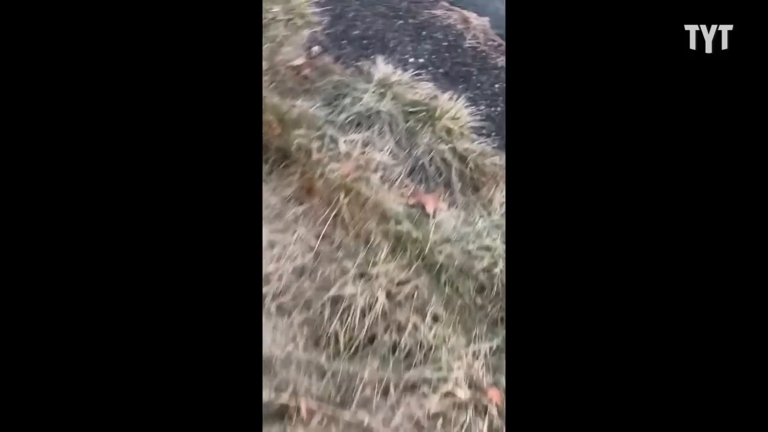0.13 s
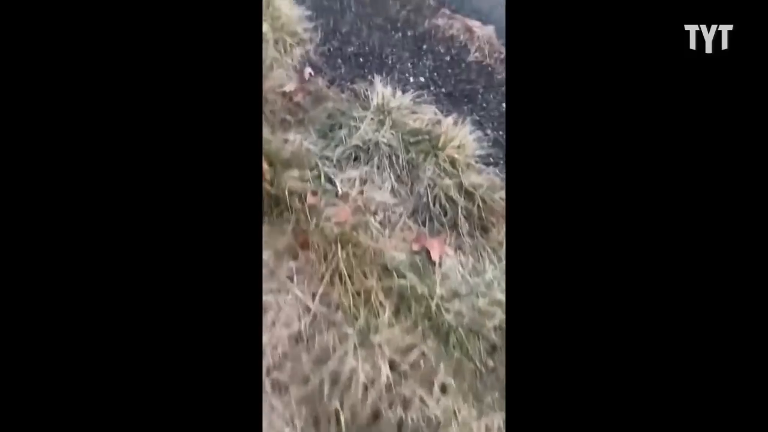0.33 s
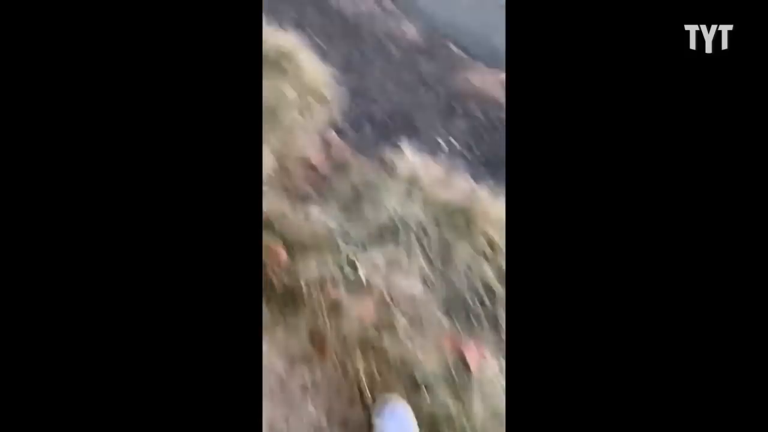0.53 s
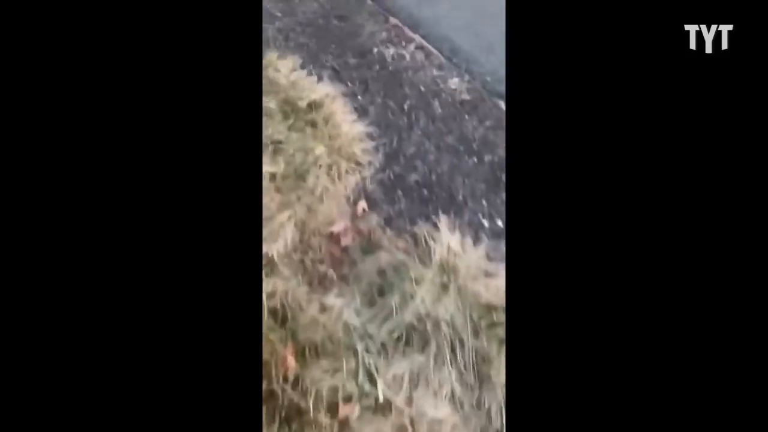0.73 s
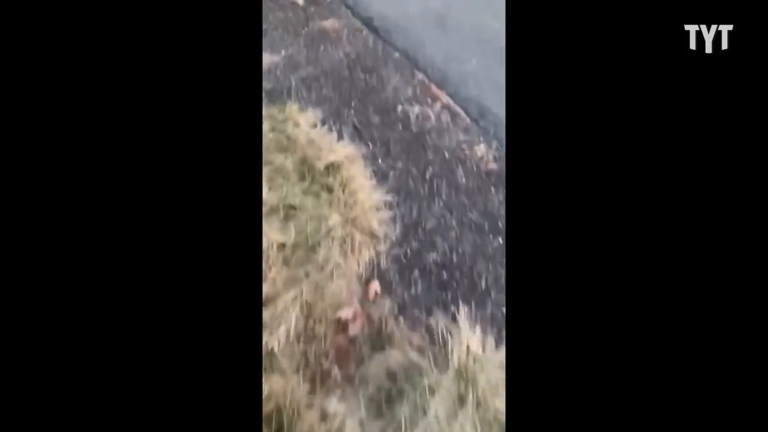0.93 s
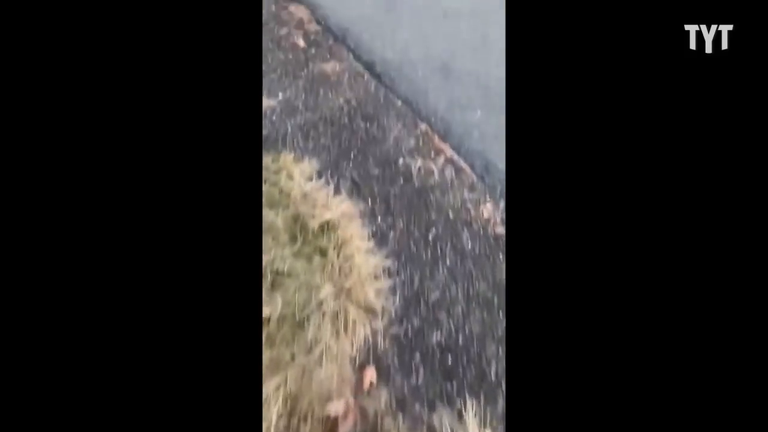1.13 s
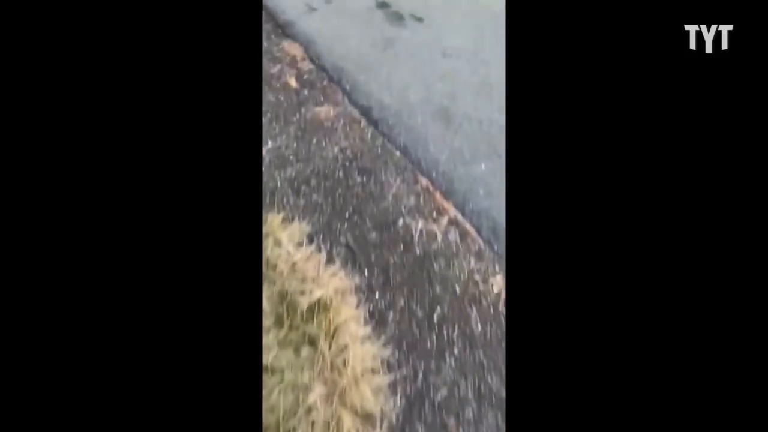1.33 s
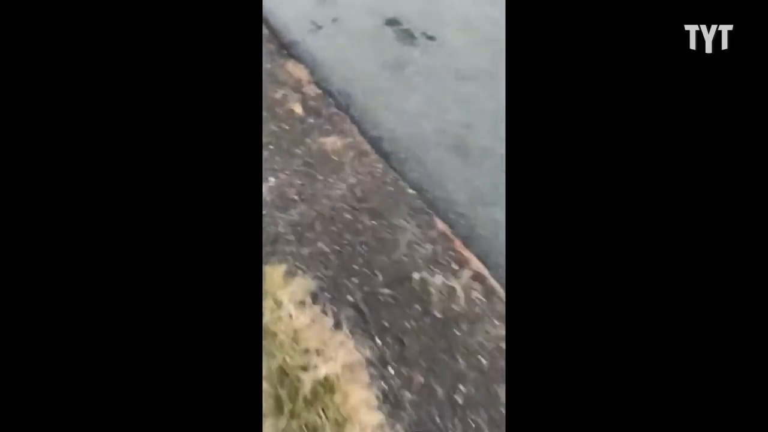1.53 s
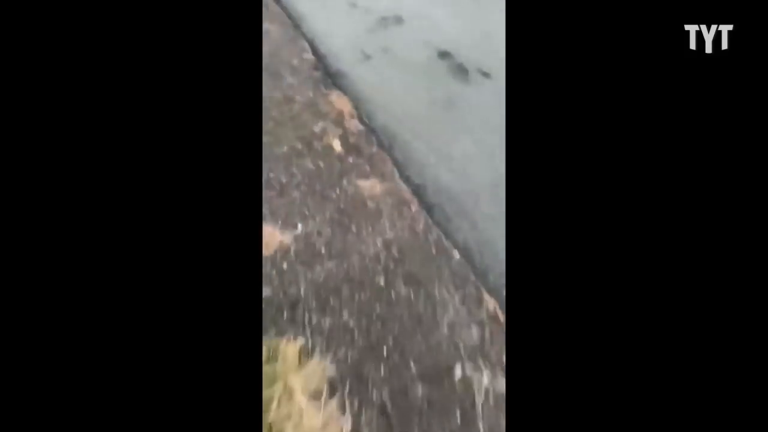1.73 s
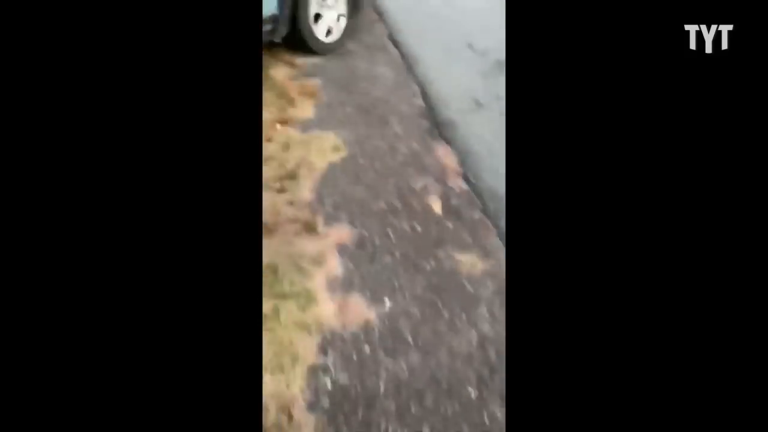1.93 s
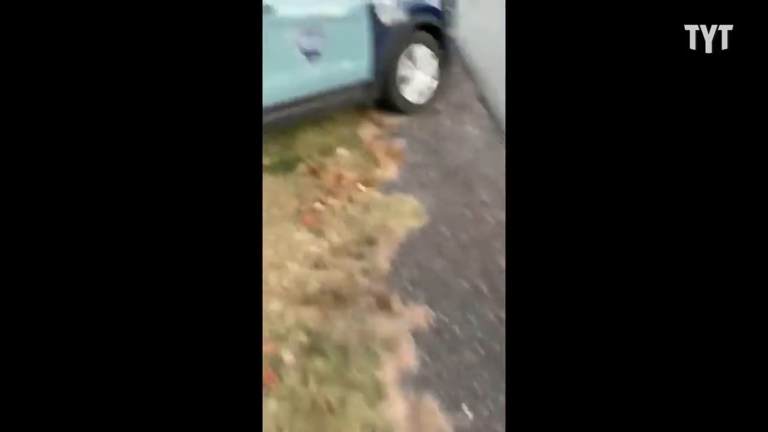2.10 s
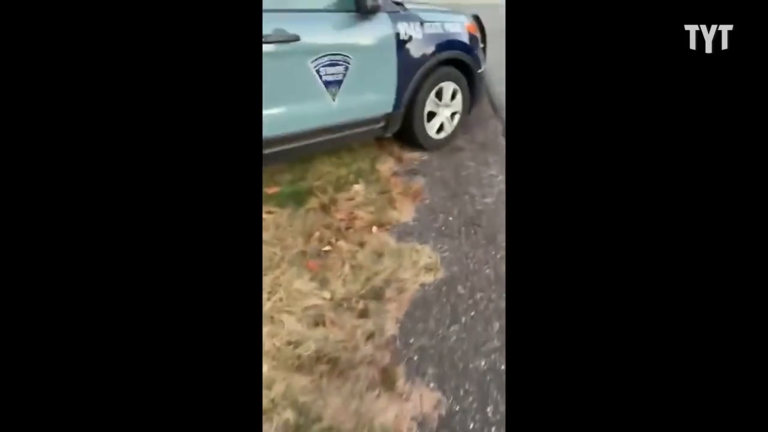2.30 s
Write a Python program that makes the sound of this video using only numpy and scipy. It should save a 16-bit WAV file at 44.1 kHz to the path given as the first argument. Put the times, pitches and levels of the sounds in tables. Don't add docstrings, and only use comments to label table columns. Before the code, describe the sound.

Roadside traffic rumbles continuously beside a walker whose steps rustle dry grass. From about one second a heavy vehicle hums by, left of centre, then drops in pitch; close small stereo microphone, dulled and slightly watery treble.

```python
import sys
import numpy as np
from scipy import signal
from scipy.fft import rfft, irfft, next_fast_len
from scipy.io import wavfile
from scipy.ndimage import uniform_filter1d

SR = 44100
rng = np.random.default_rng(int(sys.argv[2]) if len(sys.argv) > 2 else 0)


def wav_record(signal):
    frames = np.transpose(np.atleast_2d(signal))
    bounded = np.clip(frames, -1, 1)
    quanta = np.round(bounded * 32767).astype(np.int16)
    wavfile.write(sys.argv[1], SR, quanta)


def linear_from_db(decibels):
    return 10 ** (np.asarray(decibels, float) / 20)


N = 108441
START_S = 0.1025

# time in seconds, level in dB.
STREAM = [
    (0.11, -26),
    (0.14, -30.5),
    (1.31, -28.5),
    (1.48, -27.5),
    (2.09, -29.5),
    (2.11, -31),
    (2.19, -29),
    (2.22, -30),
    (2.46, -32),
]
# frequency in Hz, density in dB per Hz.
RUMBLE = [(25, -22), (60, -2), (146, -2), (300, -6), (530, -18)]
# frequency in Hz, density in dB per Hz.
TYRE_HISS = [(800, -18.5), (1300, -25), (2000, -25), (2600, -33), (3300, -33), (3750, -34), (4100, -55.5)]
# frequency in Hz, density in dB per Hz.
WIDE_ROAR = [(60, -42), (300, -7), (500, -6.5), (700, 0.5), (1300, -17), (2300, -8), (3300, -25.5),
             (5600, -22)]
KNEE_HZ = 540
WIDE_DB = -43
WIDE_FOLLOWS, HISS_FOLLOWS = 0.24, 0.68
HISS_LAG_S, HISS_RIGHT_DB = 0.00006, 1.0

# time in seconds, level in dB.
PASS = [
    (0.11, -36),
    (0.14, -44),
    (0.87, -41),
    (1.2, -30),
    (1.33, -36),
    (1.67, -31),
    (2.1, -36.5),
    (2.43, -33.5),
    (2.46, -37),
]
TYRE_HZ, TYRE_WIDTH_HZ, TYRE_DB = 681, 310, -3
TYRE_LEFT_DB, TYRE_LAG_S = 2.5, 0.00022
# time in seconds, firing tone in Hz, level in dB.
ENGINE = [
    (.1, 161, -42.5),
    (1.1, 161, -41.5),
    (1.35, 159.8, -34.5),
    (1.55, 160.6, -33),
    (1.85, 159.8, -33.5),
    (2.0, 149.4, -39),
    (2.25, 145, -37.5),
    (2.46, 147, -37),
]

# time in seconds, level in dB.
STRIDE = [(0.11, -47.5), (0.17, -49.5), (0.25, -60.5), (0.46, -62), (0.61, -48), (0.81, -52), (0.95, -59.5),
          (1.02, -49.5), (1.25, -45), (1.44, -58.5), (1.61, -56), (1.69, -45), (1.78, -56.5), (1.81, -51),
          (1.93, -70), (2.27, -48), (2.4, -58), (2.46, -56)]
# frequency in Hz, density in dB per Hz.
SWISH = [(1500, 4), (3000, -3.5), (4500, -6), (6000, -4), (8000, -6.5), (10000, -3), (11500, -6),
         (12500, 3)]
BLADES_PER_S, BLADE_SPREAD_DB, SWISH_DB = 4800, 3.0, 9.5
PORT_LAG_S = 0.00012
# middle in seconds, length in seconds, level in dB.
BRIGHT_RUSTLES = [(.13, .07, -57), (.33, .03, -65), (.57, .04, -61), (.755, .025, -58), (.825, .04, -59),
                  (.94, .03, -63), (1.055, .04, -56), (1.195, .04, -54), (1.66, .09, -55), (1.775, .03, -59),
                  (1.85, .03, -62), (1.935, .02, -66), (2.0, .04, -64), (2.175, .04, -61)]
# lower edge in Hz, upper edge in Hz.
BRIGHT_HZ = [4100, 5400]
# time in seconds, whine in Hz, level in dB.
WHINE = [
    (1.2, 384, -62.5),
    (1.5, 381, -43.5),
    (1.8, 380, -40.5),
    (2.0, 373, -38),
    (2.15, 362, -49),
    (2.46, 355, -54.5),
]

# frequency in Hz, spreads above the drop line.
KEEP_SUM = [(2200, 4.0), (2750, .5), (3300, 2.6), (6600, 2.3), (7900, -.1), (8600, 1.1), (9400, .1),
            (10600, 1.3)]
# frequency in Hz, spreads above the drop line.
KEEP_DIFFERENCE = [(100, -.5), (400, 2.5), (2900, 3.0), (3300, .5), (3700, 3.5), (5600, 3.0), (7000, -.7),
                   (11500, -1.2)]
QUIET_DROPS = 0.075
TILE_HZ, TILE_HZ_LOW = 430, 90
LINGER, FRESH_S = 0.72, 0.19
NULL_LOW_HZ, NULL_HIGH_HZ, WEAKER_DB = 3950, 5400, 7.0
SPARSE_HZ, SPARSE_SHARE = 2000, 0.75
TOP_HZ, CUTOFF_HZ = 11680, 12500
JOINT_HZ, JOINT_SIDE_DB = 5700, -4


def rms_one(x):
    return x / np.sqrt(np.mean(x ** 2) + 1e-20)


def in_time(rows):
    s, *columns = np.transpose(rows)
    return [np.interp(np.arange(N) / SR, s, c) for c in columns]


def at_hz(points, hz):
    table_hz, value = np.transpose(points)
    return np.interp(np.log(hz), np.log(table_hz), value)


def drift(rate):
    r = np.exp(-80 * np.pi * rate / SR)
    slow = signal.lfilter([1], [1, -2 * r, r * r], rng.standard_normal(N // 40 + 2002))[2000:]
    return np.interp(np.arange(N) / 40, np.arange(len(slow)), rms_one(slow - slow.mean()))


def coloured(x, points, patchy_db, rate):
    size = next_fast_len(N)
    hz = np.maximum(np.fft.rfftfreq(size, 1 / SR), 1)
    below = np.maximum(np.log2(points[0][0] / hz), 0)
    above = np.maximum(np.log2(hz / points[-1][0]), 0)
    whole = rfft(x, size) * linear_from_db(at_hz(points, hz) - 120 * below - 25.3 * above)
    out, together = 0, drift(rate)
    for k in range(9, 29):
        window = np.cos(np.pi / 2 * np.clip(2 * np.log2(hz) - k, -1, 1)) ** 2
        band = irfft(whole * window, size)[:N]
        out = out + band * linear_from_db(patchy_db * (0.22 * together + drift(rate)))
    return rms_one(out)


def late(x, s):
    size = 2 ** 17
    turn = np.exp(-2j * np.pi * np.fft.rfftfreq(size, 1 / SR) * s)
    return irfft(rfft(x, size) * turn, size)[:N]


def split(x, hz, order):
    low = signal.sosfiltfilt(signal.butter(order, hz, fs=SR, output="sos"), x)
    return low, x - low


def drone(rows, wander, waver_db):
    hz, db = in_time(rows)
    level = np.sqrt(2) * linear_from_db(db + waver_db * drift(9.0))
    phase = 2 * np.pi * np.cumsum(hz * (1 + wander * drift(4.45))) / SR
    return level * np.sin(phase)


def roar():
    db, = in_time(STREAM)
    swell = db - db.mean()
    traffic = coloured(rng.standard_normal(N), RUMBLE + TYRE_HISS, patchy_db=1.34, rate=12.5)
    rumble, hiss = split(traffic, KNEE_HZ, order=2)
    hiss = hiss * linear_from_db(db.mean() + HISS_FOLLOWS * swell)
    side = coloured(rng.standard_normal(N), WIDE_ROAR, patchy_db=0.6, rate=9.0)
    side = side * linear_from_db(WIDE_DB + WIDE_FOLLOWS * swell)
    left = hiss * linear_from_db(-HISS_RIGHT_DB) + side
    right = late(hiss, HISS_LAG_S) * linear_from_db(HISS_RIGHT_DB) - side
    return linear_from_db(db) * rumble + np.array([left, right])


def tyres():
    db, = in_time(PASS)
    b, a = signal.iirpeak(TYRE_HZ, TYRE_HZ / TYRE_WIDTH_HZ, fs=SR)
    hum = signal.lfilter(b, a, signal.lfilter(b, a, rng.standard_normal(N)))
    hum = rms_one(hum) * linear_from_db(db + TYRE_DB + 0.4 * drift(31))
    return np.array([late(hum, TYRE_LAG_S) * linear_from_db(TYRE_LEFT_DB), hum * linear_from_db(-TYRE_LEFT_DB)])


def engine():
    return drone(ENGINE, wander=0.014, waver_db=3.0)


def grass():
    db, = in_time(STRIDE)
    struck = rng.random(N) < BLADES_PER_S / SR
    force = linear_from_db(BLADE_SPREAD_DB * np.minimum(rng.exponential(1, N), 4))
    ticks = struck * force * rng.choice([-1, 1], N)
    rubbing = 0.64 * rng.standard_normal(N)
    swish = coloured(rms_one(ticks) + rubbing, SWISH, patchy_db=2.5, rate=41)
    swish = swish * linear_from_db(db + SWISH_DB + 0.5 * drift(37))
    return np.array([swish, late(swish, PORT_LAG_S)])


def bright_rustles():
    t = np.arange(N) / SR
    shape = sum(linear_from_db(db) * np.clip(3 - 6 * np.abs(t - s) / length, 0, 1) for s, length, db in BRIGHT_RUSTLES)
    band = signal.butter(6, BRIGHT_HZ, "band", fs=SR, output="sos")
    return shape * rms_one(signal.sosfilt(band, rng.standard_normal(N)))


def gear_whine():
    return drone(WHINE, wander=0.0053, waver_db=3.5)


def thrift(x):
    hz, t, both = signal.stft([x[0] + x[1], x[0] - x[1]], SR, nperseg=2048, noverlap=1024)
    tile = np.where(hz < 1000, hz // TILE_HZ_LOW, 12 + hz // TILE_HZ).astype(int)
    count = tile.max() + 1
    members = (tile == np.arange(count)[:, None]) / np.maximum(np.bincount(tile), 1)[:, None]
    db = 10 * np.log10(members @ np.abs(both) ** 2 + 1e-20)
    luck = signal.lfilter([1], [1, -LINGER], rng.standard_normal((2, 90, len(t))))
    luck = rms_one(luck)[:, :count]
    centre = np.maximum(members @ hz, 1)
    odds = np.array([at_hz(KEEP_SUM, centre), at_hz(KEEP_DIFFERENCE, centre)])[:, :, None]
    odds = odds + QUIET_DROPS * (db - np.median(db, axis=2, keepdims=True)) + 5 * (t < FRESH_S)
    keep = luck + odds > 0
    null = (centre > NULL_LOW_HZ) & (centre < NULL_HIGH_HZ)
    lead_db = uniform_filter1d((db[0] - db[1])[null], size=3, axis=0, mode="nearest")
    keep[0, null] &= lead_db + luck[1, null] > -WEAKER_DB
    strong = np.abs(both) ** 2 > SPARSE_SHARE * linear_from_db(2 * db)[:, tile]
    both = both * (strong | (hz < SPARSE_HZ)[:, None])
    top_hz = TOP_HZ + 500 * (t < FRESH_S - 0.06) + 60 * luck[0, 0]
    both = both * (hz[:, None] < top_hz)
    kept = signal.istft(both * keep[:, tile], SR, nperseg=2048, noverlap=1024)[1]
    total, difference = kept[:, :N]
    return np.array([total + difference, total - difference]) / 2


def scene():
    vehicle = tyres() + engine() + gear_whine()
    return roar() + vehicle + grass() + bright_rustles()


def top_cut(x):
    return signal.sosfilt(signal.butter(12, 12640, fs=SR, output="sos"), x)


def record(dry):
    low, high = split(dry, JOINT_HZ, order=10)
    stray = linear_from_db(JOINT_SIDE_DB) * np.roll(high[0], 2001)
    x = thrift(low + high[0] + stray * np.array([[1], [-1]]))
    x = x * (np.arange(N) >= START_S * SR)
    x = signal.sosfilt(signal.ellip(7, 0.5, 55, CUTOFF_HZ, fs=SR, output="sos"), x)
    return top_cut(x)


dry = scene()
out = record(dry)
wav_record(out)
```